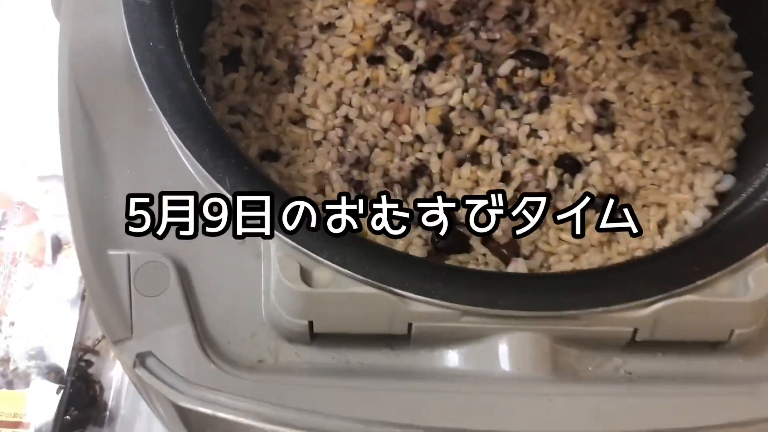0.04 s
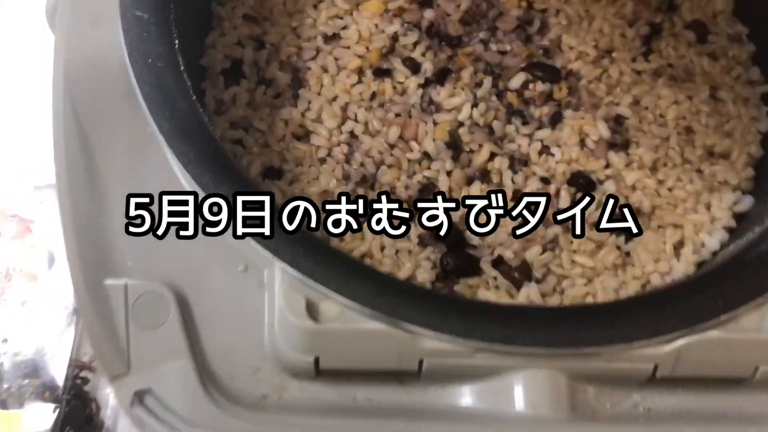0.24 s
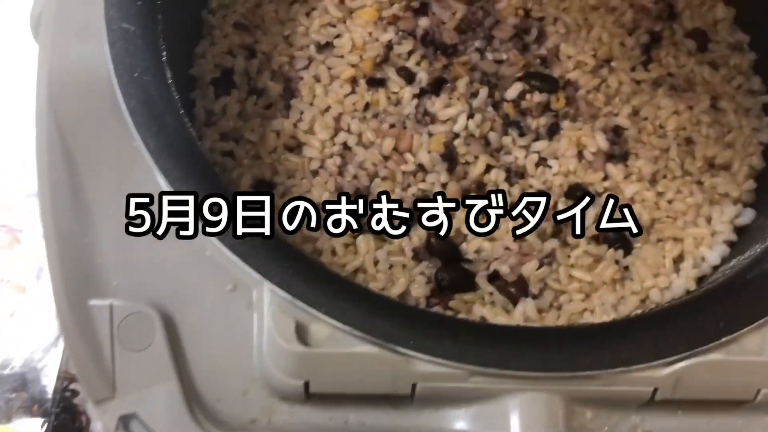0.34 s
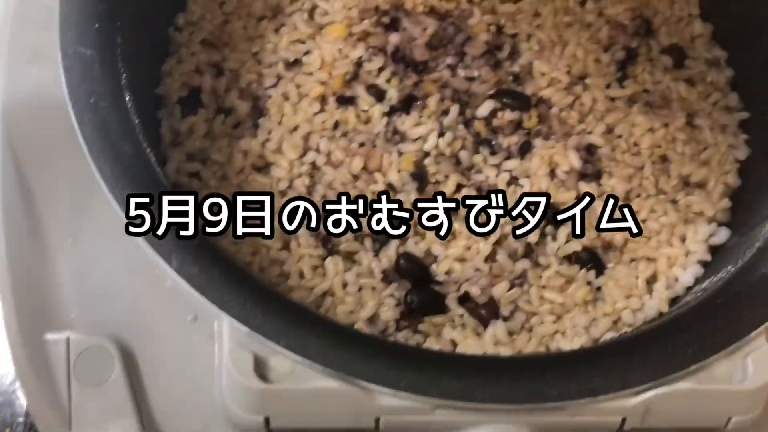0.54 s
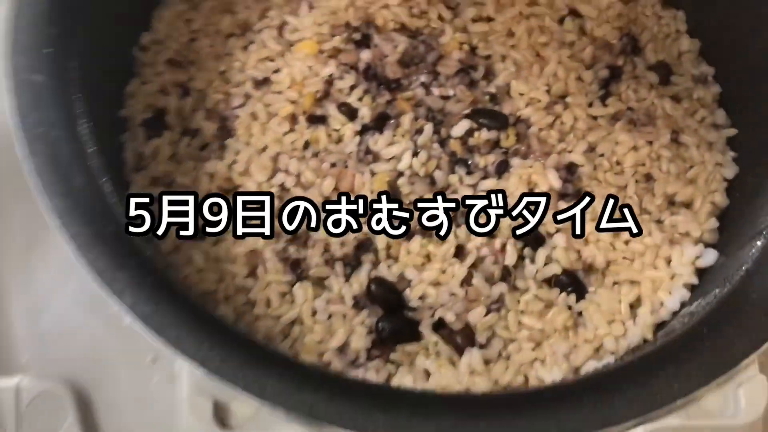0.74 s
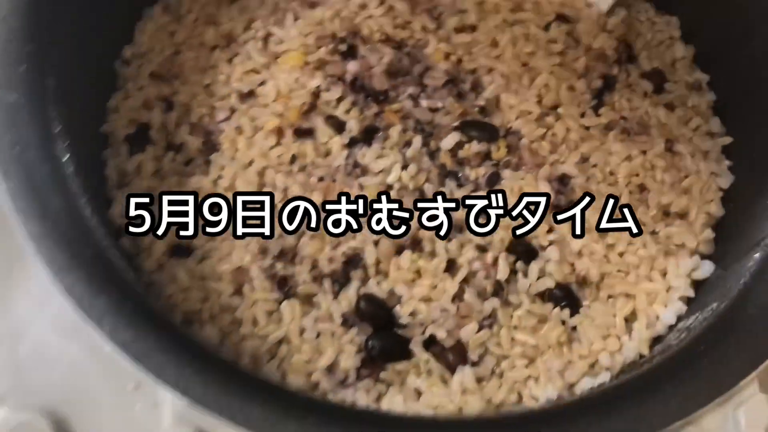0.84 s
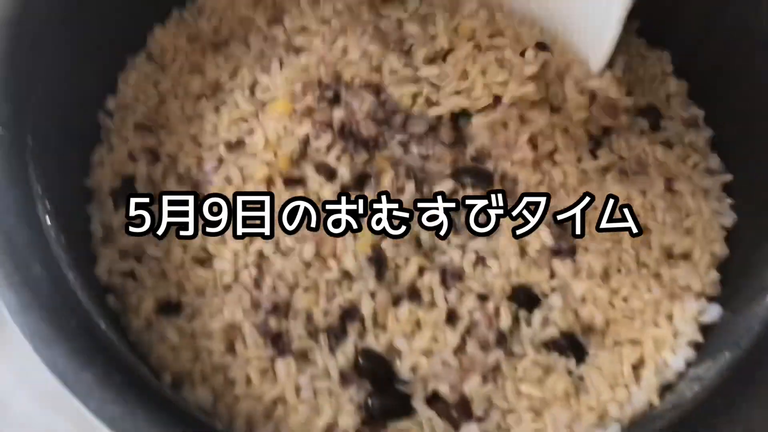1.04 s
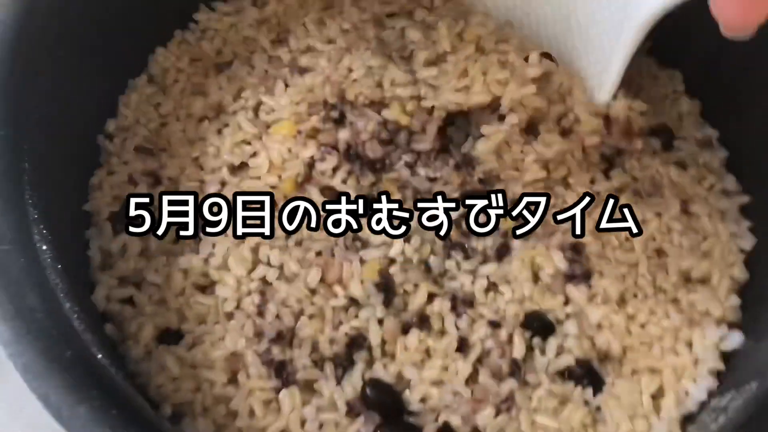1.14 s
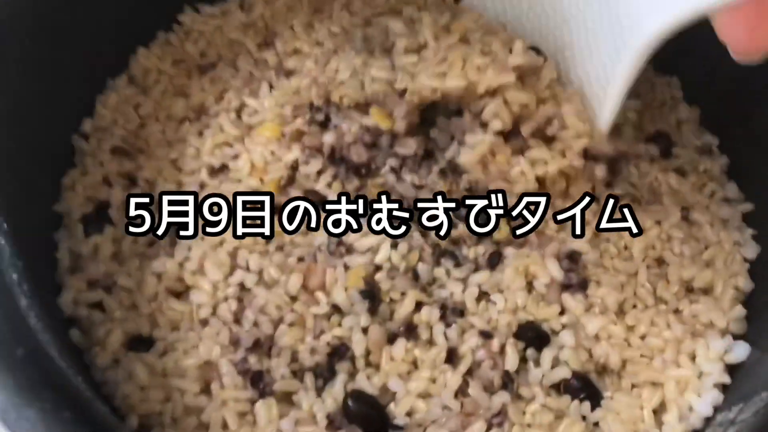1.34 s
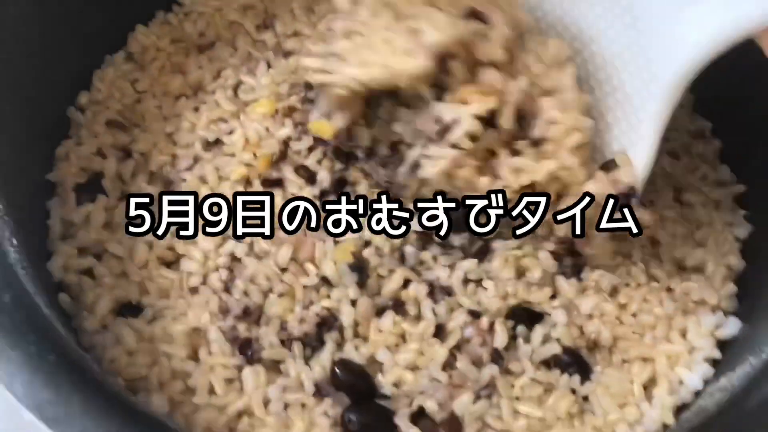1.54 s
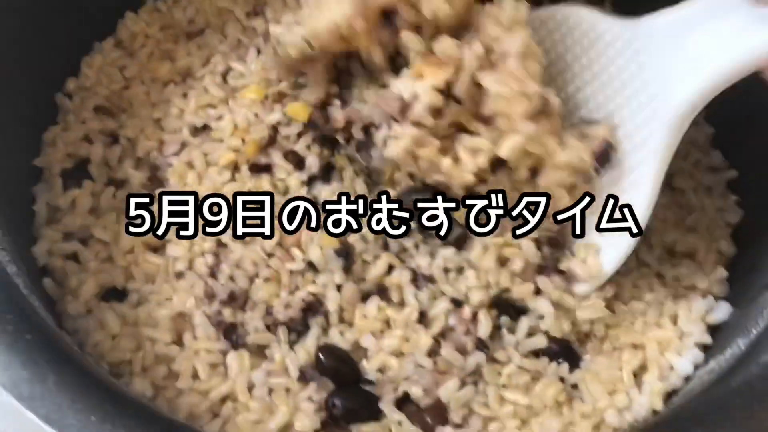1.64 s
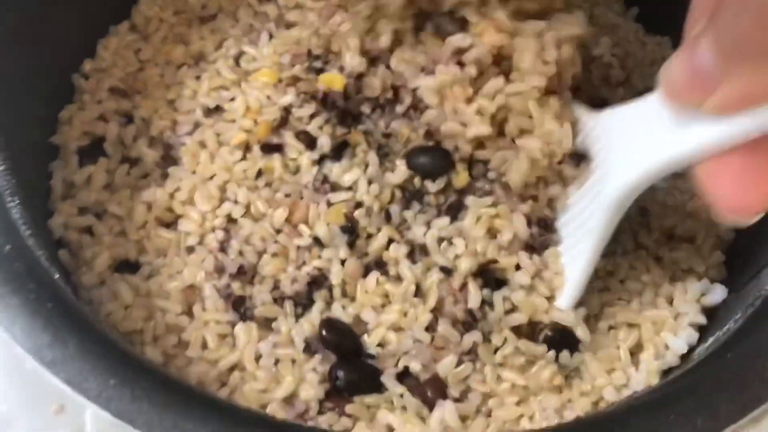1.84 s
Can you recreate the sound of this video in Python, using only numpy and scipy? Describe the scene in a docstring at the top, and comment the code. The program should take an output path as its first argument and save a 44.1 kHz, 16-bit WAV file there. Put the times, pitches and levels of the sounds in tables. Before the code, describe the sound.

A plastic paddle works cooked rice in a pot: faint knocks, one sharp bright click early, soft rustling and sticky ticks, a short gritty wall scrape, then more turning; close phone microphone, small quiet kitchen.

```python
"""A plastic paddle clicks sharply against a rice pot, knocks about before and after, then scrapes the wall.
Click, knocks and scrape all use the same set of pot tones: decaying sine waves, or noise driving resonators.
Sticky grains tick as very short sine bursts; turning the rice rustles and scuffs as filtered, gritty noise.
A small kitchen answers with a fading noise echo, over a quiet floor of filtered noise."""
import sys
import numpy as np
from scipy import signal
from scipy.fft import rfft, irfft
from scipy.io import wavfile
from scipy.ndimage import uniform_filter1d

SR = 44100
rng = np.random.default_rng(int(sys.argv[2]) if len(sys.argv) > 2 else 0)


def undo_db(level):
    """Turn decibels back into plain size, where 20 dB means ten times bigger."""
    steps = np.asarray(level, float) / 20
    return 10 ** steps


def output_pcm(signal):
    """Save a mono or channel-first signal as 16-bit PCM at the path in sys.argv[1].

    Samples are clipped to [-1, 1] before scaling.
    """
    pcm = np.clip(np.atleast_2d(signal).T, -1, 1) * 32767
    wavfile.write(sys.argv[1], SR, np.round(pcm).astype(np.int16))


N = 83790  # length in samples


def unit(x):
    """Scale to an rms (average strength) of 1."""
    return x / np.sqrt(np.mean(x ** 2))


def band(x, lo_hz, hi_hz):
    """Keep only the sound between two pitches."""
    sos = signal.butter(2, [lo_hz, min(hi_hz, .45 * SR)], "band", fs=SR, output="sos")
    return signal.sosfilt(sos, x)


def walk(rate):
    """Smooth random wander with spread near 1, drawing `rate` new values a second."""
    k = int(SR / rate)
    steps = np.repeat(rng.standard_normal(N // k + 1), k)
    return 1.4 * uniform_filter1d(uniform_filter1d(steps, k), k)[:N]


def curve(table, column):
    """Turn a dB column into a gain over time."""
    rows = np.array(table)
    return undo_db(np.interp(np.arange(N) / SR, rows[:, 0], rows[:, column], -140, rows[-1, column]))


def add(out, s, x):
    """Mix x in at s seconds."""
    i = int(s * SR)
    out[i:i + len(x)] += x[:N - i]


# rustle of hand, paddle and rice: t/s, bass level/dB, middle level/dB, treble level/dB
RUSTLE_LEVELS = [(0, -68, -83, -80), (.06, -86, -80, -90), (.2, -82, -79, -92), (.3, -69, -65, -70.5),
                 (.42, -65, -69, -69.5), (.54, -71.5, -70, -71), (.68, -75, -74.5, -77),
                 (.8, -75, -70, -77.5), (.9, -80, -75.5, -75), (.98, -89, -79.5, -91),
                 (1.1, -70.5, -71, -75), (1.33, -78, -73.5, -74.5), (1.37, -81.5, -75, -82.5),
                 (1.53, -77, -75.5, -75), (1.6, -73, -68, -67), (1.69, -68.5, -65.5, -69.5),
                 (1.78, -75, -71.5, -79), (1.9, -67.5, -67.5, -69)]
# the three rustle bands: lowest f/Hz, highest f/Hz
RUSTLE_BANDS = [(250, 1480), (1400, 4750), (5000, 13900)]
# grain crackle against the hiss in each band: level/dB
GRAIN_LEVELS = [-3.5, -16.5, 0]


def rustle():
    """Rubbing makes a flickering hiss; random clicks through the same three bands are small grains."""
    grains_per_s, grain_spread_db, flicker_db = 330, 5, 2.5
    shared, out = walk(59.28), 0
    for k, (lo, hi) in enumerate(RUSTLE_BANDS):
        moments = rng.random(N) < grains_per_s / SR
        sizes = undo_db(np.minimum(grain_spread_db * rng.exponential(size=N), 16))
        hits = moments * sizes * rng.choice([-1, 1], N)
        grains = unit(band(band(hits, lo, hi), lo, hi))
        hiss = unit(band(rng.standard_normal(N), lo, hi))
        flicker = undo_db(flicker_db * (shared + 0.22 * walk(49)))  # mostly common to all bands
        out = out + curve(RUSTLE_LEVELS, k + 1) * (hiss * flicker + undo_db(GRAIN_LEVELS[k]) * grains)
    return out


# colour of the room tone: f/Hz, relative level/dB
ROOM_COLOUR = [(20, -34), (33, -1.5), (60, -1.5), (150, -3), (400, -5.5), (1000, -15), (2300, -30),
               (5000, -27.5), (10000, -27), (16000, -38.5)]


def room_tone():
    """Quiet air and appliances: steady coloured noise plus a deep rumble that swells and sinks."""
    tone_db, rumble_db, swell_db = -69, -79.5, 5
    f, rows = np.fft.rfftfreq(N, 1 / SR), np.array(ROOM_COLOUR)
    colour = undo_db(np.interp(np.log(f + 1), np.log(rows[:, 0]), rows[:, 1]))
    tone = unit(irfft(rfft(rng.standard_normal(N)) * colour, N))
    rumble = unit(band(rng.standard_normal(N), 23, 100)) * undo_db(swell_db * walk(21))
    return undo_db(tone_db) * tone + undo_db(rumble_db) * rumble


# ringing tones (modes) of pot and paddle: f/Hz, relative level/dB, time to fade by 60 dB/s
POT_TONES = [(110, -28, 0.078), (243.4, -21.5, 0.052), (359, -11, 0.048), (448.3, -18.5, 0.096),
             (524, -11, 0.054), (628, -4.5, 0.024), (741, -13, .03), (900, -18.5, 0.027),
             (1080, -14.5, 0.021), (1305, -14.5, 0.032), (1724, -13.5, 0.014), (2040, -10.5, 0.023),
             (2136, -24.5, 0.032), (2970, -4, 0.031), (3826, -19.5, .04), (4350, -26, 0.028),
             (4800, -8.5, 0.014), (5115, -7, 0.026), (5430, -27.5, 0.011), (6660, -14.5, 0.03),
             (6445, -0.5, 0.019), (7360, -3, 0.027), (8180, 3, 0.015), (8780, -7.5, 0.038),
             (9740, -10, .027), (11300, -43, 0.048), (11800, -3, 0.012), (14100, -33, .015)]


def ring(weight_db, late_s=0., sign=None):
    """The pot's answer to one blow: fading sine waves, each starting up or down, the low ones rising slower."""
    hz, db, t60 = np.array(POT_TONES).T[:, :, None]
    t = np.arange(int(.15 * SR)) / SR
    # late_s is about the rise time at 500 Hz; it doubles an octave lower
    rise = 1 - np.exp(-t * hz / (late_s * 500 + 0.00088))
    fade = np.exp(-np.log(1000) * t / t60)
    sign = rng.choice([-1., 1.], hz.shape) if sign is None else sign
    return np.sum(sign * undo_db(db + weight_db) * rise * fade * np.sin(2 * np.pi * hz * t), axis=0)


# dull knocks of paddle and pot: t/s, peak level of the ring/dB, f where it rings most/Hz,
# distance from there at which the push is 6 dB weaker/octaves, contact noise peak against the ring/dB
KNOCK_LIST = [(0.001, -54.5, 340, 0.65, 0), (0.019, -50.5, 397, 0.36, -7), (0.063, -40.5, 450, 0.65, -10.5),
              (0.129, -55.5, 940, 0.4, -13), (0.304, -41, 453, 0.58, -3), (0.333, -54, 517, 0.28, -17),
              (0.374, -36, 1320, 0.65, -2.5), (0.452, -47, 426, 0.52, -9), (0.476, -45.5, 1030, 0.41, -18),
              (0.492, -53, 511, 0.29, -6), (0.535, -52, 428, 0.39, -6.5), (0.564, -57, 526, 0.5, 8),
              (0.631, -56, 1700, 0.22, -9), (0.641, -56, 430, 0.4, -16), (0.667, -53, 1850, 0.3, -16),
              (0.711, -46.5, 1080, 0.18, -22), (0.83, -36.5, 455, 0.5, -7.5), (0.844, -50, 605, 0.5, 6),
              (0.855, -51, 463, 0.5, -4), (0.932, -50, 543, 0.35, 5), (1.013, -56.5, 1540, 0.5, -18.5),
              (1.26, -53.5, 522, 0.26, -21), (1.428, -55, 356, 0.47, -2), (1.712, -55, 448, 0.5, -13),
              (1.821, -56, 2280, 0.2, 5), (0.375, -44, 2970, 0.22, -15), (.828, -41.5, 1320, 0.42, -9),
              (0.827, -43, 2040, 0.42, -18), (.85, -58, 110, .5, -11), (.845, -48, 3100, .3, 0)]


def knocks():
    """Soft blows ring the pot tones near one pitch, with a short noisy scuff at the contact."""
    push_s = 0.00067  # slowness of the push, as late_s in ring()
    out, modes = np.zeros(N), np.array(POT_TONES)
    t = np.arange(2000) / SR
    for s, db, hz, spread, noise_db in KNOCK_LIST:
        distance = np.log2(modes[:, :1] / hz) / max(spread, .1)
        # the first term halves the level differences between the tones
        blow = ring(-.5 * modes[:, 1:2] - 6 * distance ** 2, push_s)
        scuff = band(rng.standard_normal(2000), hz / 2.34, hz * 4) * np.exp(-t / 0.0056)
        add(out, s, undo_db(db) * blow / np.abs(blow).max())
        add(out, s, undo_db(db + noise_db) * scuff / np.abs(scuff).max())
    return out


# fading of the kitchen echo: centre f/Hz, time to fade by 60 dB/s
ECHO_FADE = [(400, .5), (1500, 0.36), (5000, 0.21), (12000, 0.092)]


def kitchen(x):
    """Blurred echo of tiles and cupboards: noise bands that fade faster in the treble."""
    echo_db, build_up_s = -20.5, 0.0031
    t, tail = np.arange(int(.7 * SR)) / SR, 0
    for hz, t60 in ECHO_FADE:
        noise = band(rng.standard_normal(len(t)), hz / 2, hz * 2)
        tail = tail + noise * np.exp(-np.log(1000) * t / t60)
    tail = tail * np.clip(t / build_up_s, 0, 1) ** 2
    return undo_db(echo_db) * signal.fftconvolve(x, tail / np.sqrt(np.sum(tail ** 2)))[:N]


# sticky grains tick as they part: t/s, level before fading/dB, f/Hz, length/cycles
TICK_LIST = [(0.0492, -45.5, 6730, 7.4), (0.374, -53, 3000, 1.9), (0.459, -36.5, 5930, 3.2),
             (0.4784, -35, 5800, 1.2), (0.5316, -38, 10300, 3.2), (0.5344, -35, 9450, 3.3),
             (0.5404, -46, 9400, 2.5), (0.5704, -46, 5050, 1.3), (0.5764, -32.5, 8280, 7.5),
             (0.595, -41, 7130, 2.8), (0.608, -36, 12600, 3.7), (0.6184, -43, 11200, 2.5),
             (0.6309, -44, 6550, 4.8), (0.6449, -36, 8000, 7.1), (0.6493, -39, 11300, 5.4),
             (0.6694, -32.5, 3800, 0.92), (0.9318, -60, 3490, 2.5), (0.947, -43, 9960, 2.9),
             (0.9533, -45, 10100, 3), (1.0707, -53, 6590, 1.6), (1.1318, -43.5, 6350, 2.5),
             (1.1832, -30, 7440, 1.5), (1.1911, -36, 7540, 1.4), (1.318, -49, 3690, 2.7),
             (1.397, -33, 7200, 1.9), (1.4291, -46, 3340, 3.1), (1.5193, -51, 3200, 2.3),
             (1.558, -59, 3400, 2), (1.6209, -34.5, 5900, 2.9), (1.6345, -40, 2980, 2.2),
             (1.6535, -35, 3470, 3.4), (1.713, -58, 3140, 2.5), (1.737, -42.5, 5350, 1.6),
             (1.824, -51, 3040, 2), (1.8381, -40, 3400, 2.1), (1.872, -51, 3460, 2.5)]


def ticks():
    """Each parting grain gives a quickly fading sine wave with a noisy wake."""
    out, t = np.zeros(N), np.arange(300) / SR
    for s, db, hz, cycles in TICK_LIST:
        fade = np.exp(-t * hz / (0.34 * max(cycles, .3)))
        snap = np.sin(2 * np.pi * hz * t) * fade
        wake = band(rng.standard_normal(300), hz / 0.79, hz * 1.9) * np.exp(-t / 0.0014)
        add(out, s, undo_db(db) * (snap + undo_db(-7) * wake))
    return out


# crumbly scuffs of the paddle through rice:
# start t/s, length/s, level before rise and fade/dB, centre f/Hz, full width/octaves
SCUFF_LIST = [(0.127, 0.016, -62, 1280, 1.25), (0.402, 0.11, -62.5, 6750, 0.76),
              (0.468, 0.036, -60, 1170, 1.5), (0.563, 0.0071, -54, 2940, 2.6),
              (0.663, 0.015, -61, 5000, 2.5), (0.725, 0.028, -63.5, 7600, 1.3),
              (0.841, 0.044, -59, 3360, 1.74), (.845, 0.048, -58, 590, 1.46),
              (0.931, 0.023, -65, 3000, 2.6), (1.13, 0.0078, -59, 8900, 1.4),
              (1.379, 0.023, -70, 3020, 0.78), (1.559, 0.11, -63.5, 900, 0.76),
              (1.574, 0.049, -61, 3300, 0.52), (1.623, 0.0079, -51, 7000, 2.2),
              (1.65, 0.018, -54.5, 2780, 0.77), (1.697, 0.024, -69, 1780, 1.3),
              (1.812, 0.037, -57, 2220, 1.4), (1.861, 0.024, -57, 2970, 2.15), (1.89, 0.022, -64, 2500, 1)]


def scuffs():
    """Grains shoved aside make short bursts of gritty noise: quick rise, ragged hold, fading end."""
    grit_db = 4.5
    out = np.zeros(N)
    for s, length, db, hz, width in SCUFF_LIST:
        u = np.arange(6000) / SR / length  # time in scuff lengths
        hiss = rng.standard_normal(6000)
        spikes_db = np.minimum(grit_db * rng.exponential(size=6000), 20)
        grit = hiss * undo_db(spikes_db + 2.8 * walk(300)[:6000])
        half = 2 ** (width / 2)
        noise = unit(band(grit, hz / half, hz * half))
        add(out, s, undo_db(db) * noise * np.clip(u / 0.32, 0, 1) * np.exp(-u ** 3))
    return out


# first touch, main blow and rebound of the click: delay t/s
REBOUND_TIMES = [0, .0003, .0016]
# the same three contacts: relative level/dB
REBOUND_LEVELS = [-6, 1, -11]


def click():
    """Hard edge on hard edge: a bright crack and all pot tones; returns the sound and its kitchen feed."""
    start_s, ring_db, crack_db, wake_db = .2269, -18, -0.5, -21.5
    bass_late_s = 0.0016  # as late_s in ring()
    ring_send_db, crack_send_db = -6.5, 8
    rung, crack = np.zeros(N), np.zeros(N)
    alternating = (-1.) ** np.arange(len(POT_TONES))[:, None]
    add(rung, start_s, undo_db(ring_db) * band(ring(0., bass_late_s, alternating), 150, 15400))
    impulse = np.eye(1, 400)[0]
    for late, db in zip(REBOUND_TIMES, REBOUND_LEVELS):
        add(crack, start_s + late, undo_db(crack_db + db) * band(impulse, 2500, 16500))
    splinters = band(rng.standard_normal(900), 7200, 18000) * np.exp(-np.arange(900) / SR / 0.0015)
    add(crack, start_s, undo_db(wake_db) * splinters)
    # the kitchen gets one simple click in place of the detailed crack
    crack_send = band(np.eye(1, N, int(start_s * SR))[0], 200, 9000)
    return rung + crack, undo_db(ring_send_db) * rung + undo_db(crack_send_db) * crack_send


# paddle dragging on the pot wall: t/s, level of the low-middle rub/dB
SCRAPE_LEVELS = [(1.04, -84), (1.082, -70), (1.146, -54.5), (1.152, -61), (1.232, -59.5), (1.248, -64.5),
                 (1.294, -60.5), (1.344, -65), (1.36, -102)]
# how strongly each pitch rings under friction: f/Hz, relative level/dB
FRICTION_COLOUR = [(2150, -3), (3000, -9), (4400, 4.5), (5400, -5), (7000, 4.5), (12000, -13)]


def scrape():
    """Gritty friction drives the pot's upper tones, each wavering by itself, rubs in the low middle and hisses."""
    grit_db, flutter_db = 1.34, 3
    damping = 1.15  # rice shortens the ring by this factor
    grit = rng.standard_normal(N) * undo_db(grit_db * rng.exponential(size=N) + 1.5 * walk(89.9))
    rung = 0
    for hz, _, t60 in POT_TONES:
        if hz > 2100:
            # a resonator that rings at hz when fed with grit
            pole = np.exp((2j * np.pi * hz - np.log(1000) * damping / t60) / SR)
            tone = unit(signal.lfilter([1], [1, -pole], grit).imag)
            tone_db = np.interp(hz, *np.array(FRICTION_COLOUR).T)
            rung = rung + undo_db(tone_db + flutter_db * walk(24.8)) * tone
    rub = unit(band(band(grit, 430, 1330), 370, 1370))
    hiss = unit(band(grit, 2670, 9700))
    touching = np.arange(N) < SCRAPE_LEVELS[-1][0] * SR
    return curve(SCRAPE_LEVELS, 1) * (rub + undo_db(-6) * unit(rung) + undo_db(-8) * hiss) * touching


def scene():
    """Everything at the pot, its echo, the rustle and the room tone."""
    snap, send = click()
    near = knocks() + ticks() + scrape() + scuffs()
    return (snap + near + kitchen(near + send) + rustle() + room_tone())[None]


def roll_off(x):
    """The treble ends steeply here."""
    return signal.sosfilt(signal.butter(12, 17140, fs=SR, output="sos"), x)


def record(dry):
    """The phone cuts the top of the treble with a steep filter."""
    top_hz = 16500
    low_pass = signal.ellip(8, .2, 70, top_hz, fs=SR, output="sos")
    mix = signal.sosfilt(low_pass, dry)
    return roll_off(mix)


dry = scene()
out = record(dry)
output_pcm(out)
```